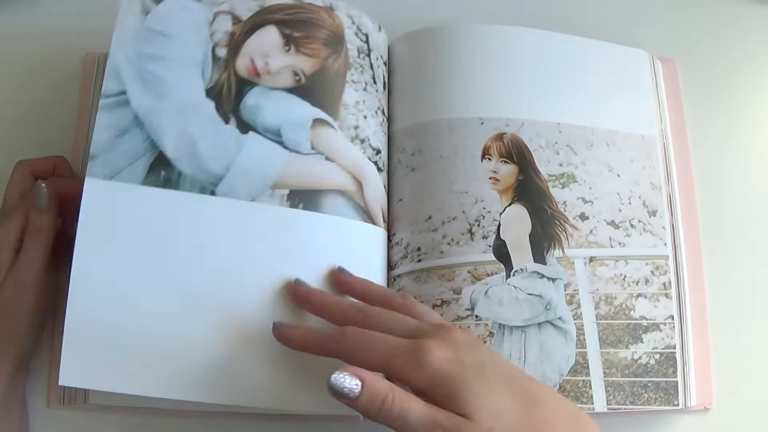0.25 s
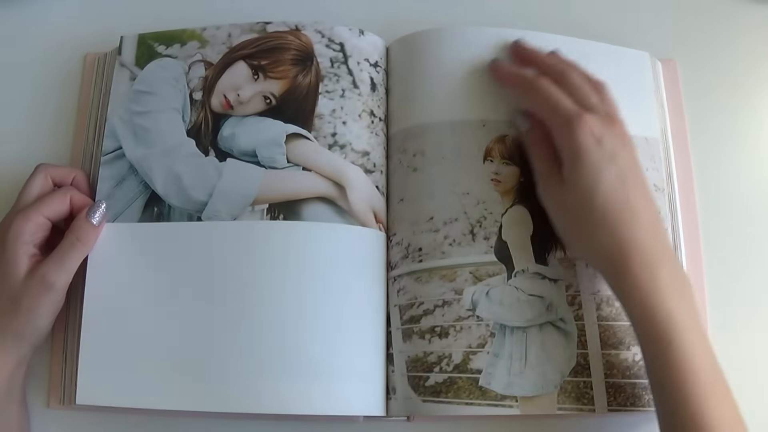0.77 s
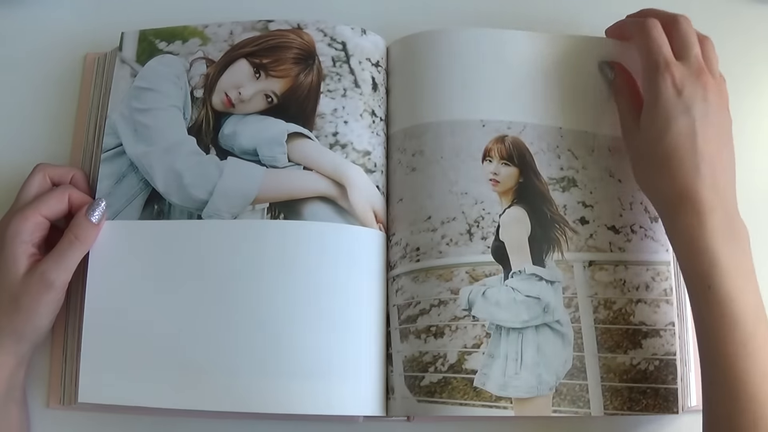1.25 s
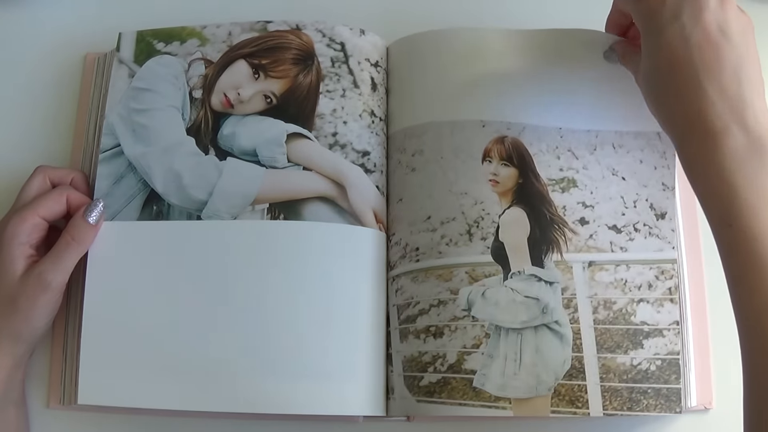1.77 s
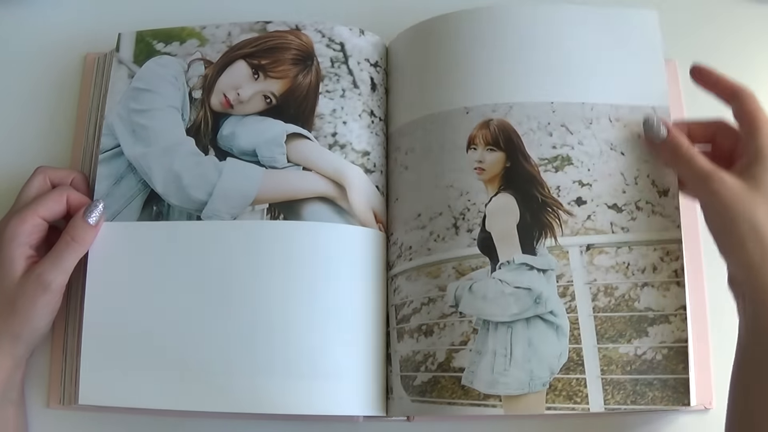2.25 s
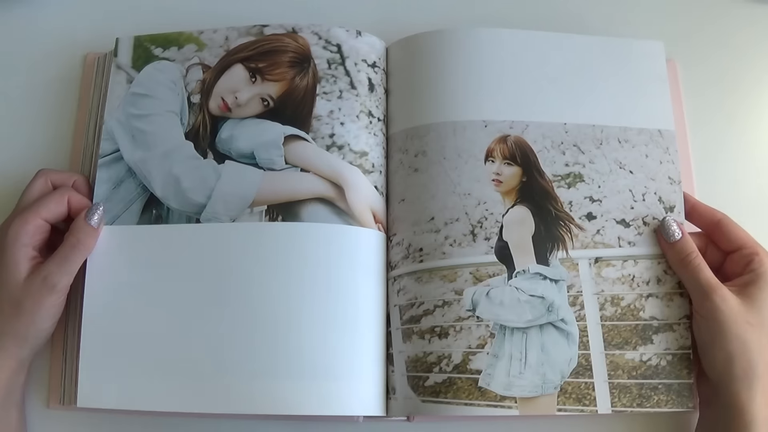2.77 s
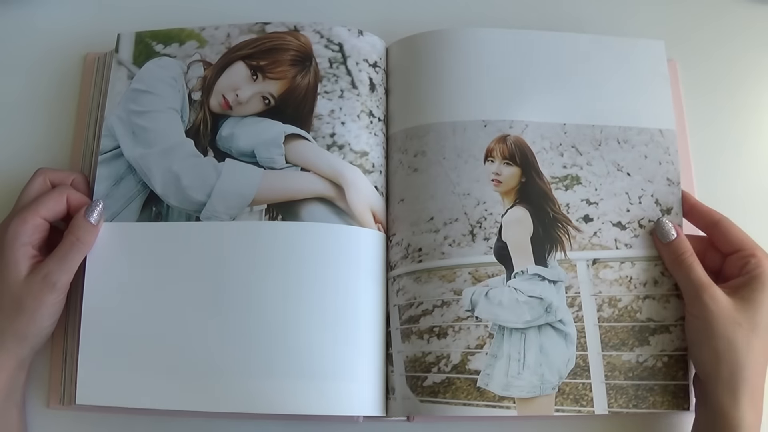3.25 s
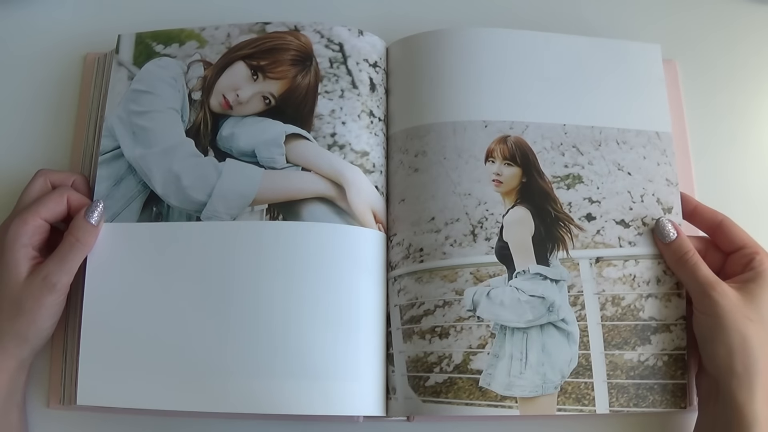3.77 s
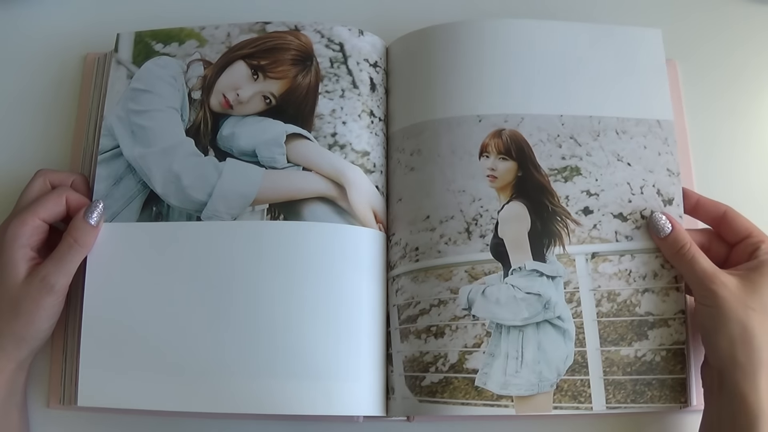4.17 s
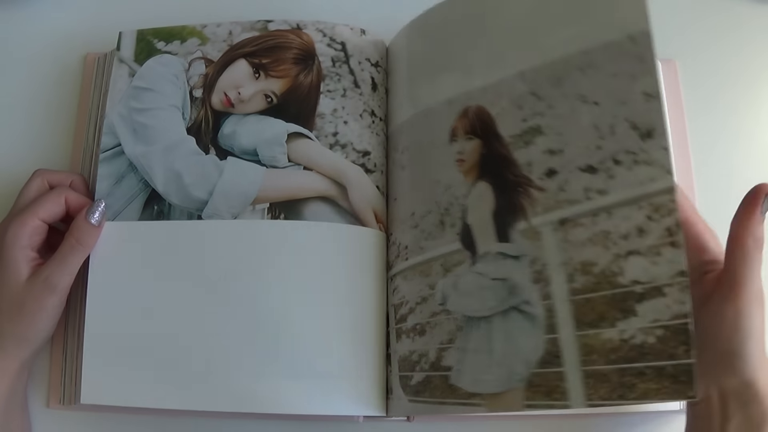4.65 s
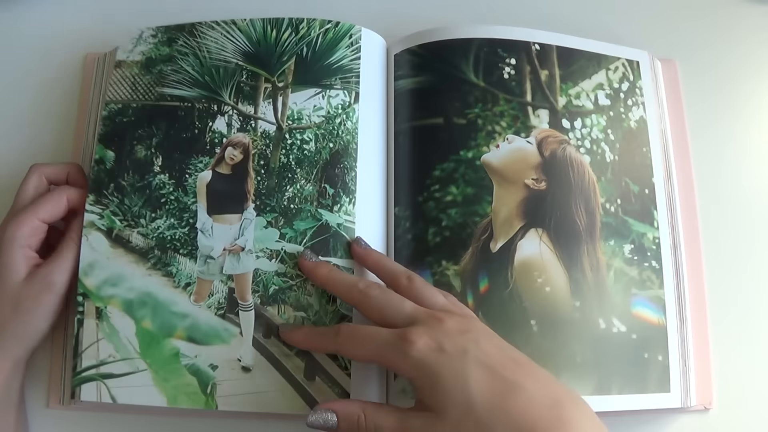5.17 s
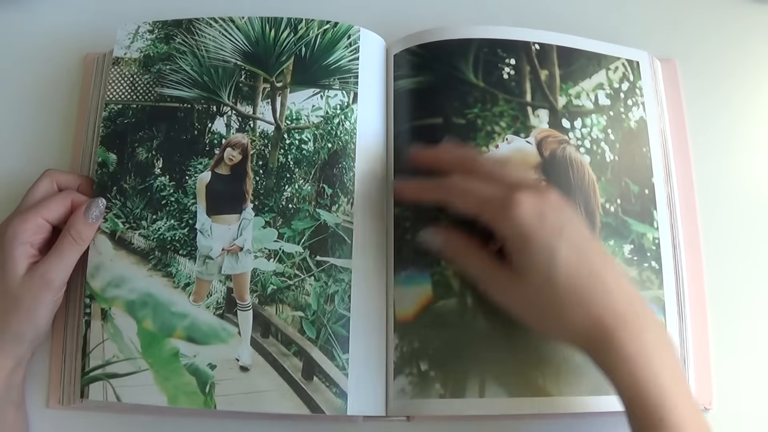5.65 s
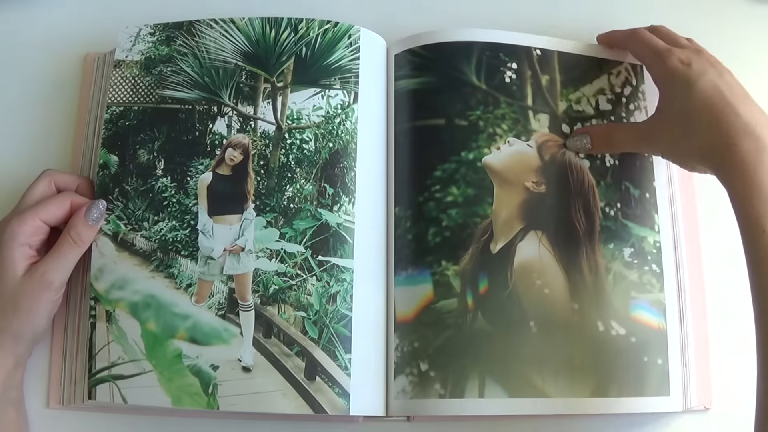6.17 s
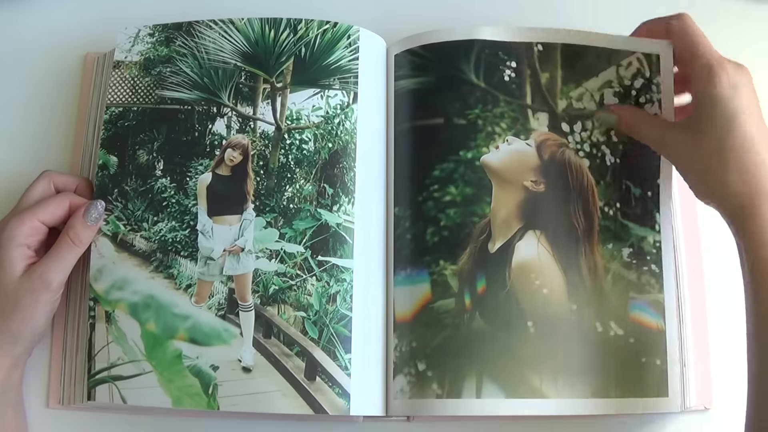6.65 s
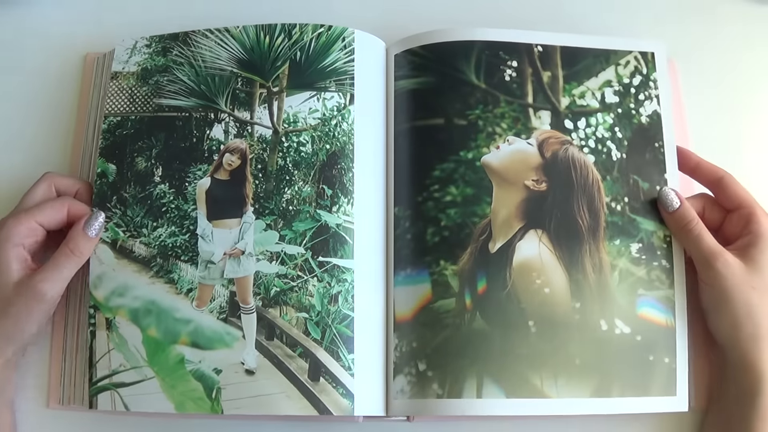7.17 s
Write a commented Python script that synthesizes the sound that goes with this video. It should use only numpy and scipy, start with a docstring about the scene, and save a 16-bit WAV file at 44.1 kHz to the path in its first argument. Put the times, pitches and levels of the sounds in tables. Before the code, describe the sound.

A large book with stiff glossy pages is handled close to the microphone in a small quiet room. For the first second or so, a palm smooths a page with a soft hiss. From 1.4 seconds a finger rubs the corner free in scratchy strokes, with a snap at 2 seconds and a sliding rustle until about 2.7. Faint creaks and nail ticks follow as the bent page is held. Between 4.2 and 4.6 seconds the sheet buckles with several sharp pops, the loudest moment. It lifts, swishes over and lands slightly to the left with a tick around 5.2. A crisp snap and another smoothing hiss come at 5.6. From 6.5 seconds fingers pick up the next page, with a pop at 6.7 and a slide along its edge, ending in light ticks. Low room hum, faint camera ticking and a thin high whistle continue throughout.

```python
"""A small quiet room, where hands leaf through a large book of stiff glossy paper on a table.
A palm smooths the page and a finger rubs the corner free: countless tiny slips make the paper hiss.
The bent sheet creaks, buckles with sharp pops, swings over and lands; the next page is smoothed
and picked up. Table and walls add short echoes. Underneath, the room hums and a camera faintly
ticks and whistles."""
import sys
import numpy as np
from scipy import signal
from scipy.fft import rfft, irfft, next_fast_len
from scipy.io import wavfile
from scipy.ndimage import uniform_filter1d, map_coordinates

SR = 44100
rng = np.random.default_rng(int(sys.argv[2]) if len(sys.argv) > 2 else 0)


def wrap_up_sound(samples):
    """Save the sound to the file named by the first command line argument, as 16-bit audio."""
    columns = np.atleast_2d(samples).T
    # keep every value between -1 and 1, then stretch to whole-number steps
    tamed = np.clip(columns, -1, 1)
    steps = np.round(tamed * 32767).astype(np.int16)
    wavfile.write(sys.argv[1], SR, steps)


N = 326937

# Each rubbing move has two tables. A tone says how strong the low and high pitches are.
# Strokes: start_s, rise_s, fall_s, sheet_db, rasp_db, hiss_db. Tone: pitch_hz, level_db
PALM_STROKES = [(-0.04, 0.034, 0.14, -64.5, -56.5, -54), (0.1, 0.2, .08, -62.5, -54.5, -58.5),
                (0.485, .285, .28, -60, -49, -44.5), (1.03, .12, .17, -62.5, -54, -60.5),
                (5.47, 0.098, .04, -52.5, -53, -53), (5.595, 0.17, 0.26, -60.5, -51, -43.5)]  # the palm smooths a page
PALM_TONE = [(150, -12), (300, -11.5), (600, -10.5), (1200, -10), (2000, -7.5), (3000, -4.5), (4200, -6),
             (6000, -4.5), (8500, -5), (10500, 1.5), (12000, 2), (13500, -6), (15400, -7)]
CORNER_STROKES = [(1.423, 0.028, 0.047, -53, -46, -52), (1.695, 0.027, 0.016, -54.5, -58, -55),
                  (1.732, 0.024, 0.055, -49, -34.5, -38.5), (1.8, 0.092, 0.049, -49, -35.5, -47),
                  (1.985, .02, 0.038, -50.5, -41.5, -55)]  # a finger rubs the corner free
CORNER_TONE = [(40, -75), (120, -47), (300, -18), (600, -13), (1050, -2.5), (1500, -4), (2200, -0.5),
               (3100, -1.5), (4000, -7), (5000, -7.5), (6500, -12), (9000, -23.5), (11300, -19.5),
               (15400, -44)]
SLIDE_STROKES = [(2.062, 0.11, 0.015, -45.5, -35, -41), (2.18, 0.016, 0.09, -52, -51, -45),
                 (2.323, 0.016, 0.063, -53.5, -54.5, -45), (2.4, 0.047, 0.067, -53, -43.5, -46),
                 (2.52, 0.032, 0.3, -56.5, -55.5, -65), (2.67, 0.019, 0.022, -56.5, -48, -52)]  # the sheet slides over its neighbour
SLIDE_TONE = [(120, -27), (300, -16.5), (600, -16), (1100, -7.5), (1600, -7.5), (2200, -6), (3300, -3.5),
              (5000, 0), (6500, -6.5), (8500, -7.5), (11700, -4.5), (13000, -14), (15400, -20)]
LIFT_STROKES = [(4.47, 0.092, 0.05, -40, -48, -57), (4.58, 0.054, 0.093, -59, -51.5, -53.5)]  # the sheet is lifted and peels away
LIFT_TONE = [(70, -28), (150, -14), (400, -16), (700, -10), (1040, -0.5), (1300, -5.5), (2000, -21),
             (3700, -22.5), (5000, -22.5), (6500, -29.5), (8500, -25), (12000, -25), (15400, -37)]
SWING_STROKES = [(4.798, 0.18, 0.12, -61.5, -52, -47.5), (4.979, .01, 0.033, -43, -44.5, -61),
                 (5.09, .09, .12, -51, -51.5, -55.5)]  # it swings over, lands and settles
SWING_TONE = [(80, -21), (150, -18), (500, -13.5), (750, -17), (1100, -4.5), (1420, -2), (2200, -9),
              (3500, -8.5), (4500, -8), (5600, -11), (8500, -16), (11300, -14.5), (15400, -24.5)]
PICK_STROKES = [(6.52, 0.066, 0.025, -44.5, -40, -46), (6.615, .1, 0.078, -47.5, -40.5, -42.5),
                (6.77, .09, 0.18, -58, -46, -44.5), (6.96, 0.074, 0.076, -57.5, -47.5, -62),
                (7.105, 0.014, 0.034, -54.5, -54.5, -52)]  # fingers pick up the next page and run down its edge
PICK_TONE = [(120, -22), (300, -17.5), (700, -10.5), (1300, -8.5), (2200, -1), (3100, 1.5), (4000, -0.5),
             (4600, 0), (5200, 1), (6200, -5), (8500, -11), (11000, -6), (12500, -11.5), (15400, -23)]

# The sheet buckles: start_s, level_db, pitch_hz, decay_s, crack_db, thump_db
POPS = [(1.985, -14, 2830, 0.0081, -24.5, -39), (4.1843, -18, 1330, 0.0071, -12, -8.5),
        (4.263, -10, 1250, 0.0064, -14.5, -19), (4.3657, -14, 1130, 0.012, -14.5, -16),
        (4.3974, -16, 1270, 0.01, -16, -18), (4.4086, -21, 1410, 0.0099, -11, -25),
        (4.5511, -22.5, 1020, 0.035, -24, -24), (5.586, -30.5, 1370, 0.011, -6.5, -12),
        (6.719, -11, 758, 0.02, -17, -10.5)]  # every decay_s is the time a sound takes to fade by 60 dB
# The open pages and the table ring: pitch_hz, level_db, decay_s
BOOK_RINGS = [(282, -12.5, 0.053), (627, -23, 0.11), (705, -21, 0.12), (770, -25, .11), (1040, -20, 0.11),
              (1280, -16.5, 0.068), (1444, -22, 0.1)]
# Nails and page edges tick, and the landing sheet clicks at 5.2 s: start_s, level_db, pitch_hz
TICKS = [(0.1848, -40.5, 2000), (0.408, -37, 1440), (1.704, -37, 1420), (2.326, -31, 1030),
         (3.239, -41, 1210), (3.679, -39, 2010), (3.908, -38.5, 2010), (4, -39.5, 1290), (4.045, -35, 1310),
         (4.8037, -33, 1000), (4.873, -38, 1540), (5.173, -40, 1170), (5.186, -45, 4640), (5.2, -22, 1500),
         (5.482, -35, 1870), (5.5629, -37, 1250), (6.295, -34, 820), (7.117, -34.5, 1430),
         (7.229, -40.5, 1180)]
# An edge flicks past its neighbours: middle_s, level_db, half_length_s, pitch_hz
FLICKS = [(0.566, -44, 0.0043, 5760), (1.16, -53, 0.011, 4500), (1.756, -37.5, 0.014, 4330),
          (1.983, -29, 0.00096, 2080), (2.074, -38.5, .004, 4300), (2.172, -34.5, 0.0069, 4630),
          (4.99, -33.5, 0.0043, 1530), (6.295, -50.5, 0.0028, 8500), (6.586, -37, 0.0045, 4530),
          (6.711, -26.5, 0.0025, 2180), (6.72, -21, 0.0009, 2930), (7.231, -49, 0.0068, 8200)]
# The sheet flaps and pushes air: start_s, level_db, rise_s, decay_s
FLAPS = [(0.72, -58, .02, 0.19), (2.027, -34, 0.0033, 0.14), (2.239, -48.5, 0.016, 0.4),
         (4.265, -33, 0.0021, 0.14), (4.396, -37.5, 0.0054, 0.18), (4.81, -46.5, 0.019, 0.36),
         (5.17, -51.5, 0.011, 0.49), (5.55, -50.5, 0.018, 0.14), (6.555, -47.5, 0.01, .2),
         (6.722, -49, 0.0033, 0.082)]
# Fingers creak on the bent page: start_s, rise_s, fall_s, level_db
CREAKS = [(2.8, .3, 0.17, -66), (3.47, .03, 0.085, -60.5), (3.67, .2, 0.21, -57), (5.32, 0.097, .08, -63)]
# Air under the sheet hoots as its pocket changes size:
# start_s, rise_s, fall_s, first_hz, last_hz, level_db
POCKET_HOOTS = [(0.3, 0.089, 0.24, 1453, 1456, -57), (2.155, .01, .105, 1658, 1403, -45.5),
                (2.41, 0.042, 0.18, 1070, 1527, -47), (4.49, 0.093, .05, 1190, 963, -44),
                (6.73, .01, 0.091, 723, 800, -54), (6.98, 0.086, 0.042, 1230, 1935, -50)]
# Skin on glossy paper gives a thin, high hiss: start_s, rise_s, fall_s, first_hz, last_hz, level_db
SKIN_HISSES = [(0.72, .28, .28, 3023, 3094, -57), (2.43, .02, 0.12, 4860, 4920, -55),
               (6.85, 0.132, 0.071, 4990, 5130, -48)]

# The tones of the other sounds: pitch_hz, level_db
CRACK_TONE = [(300, -4), (1300, 0.5), (2200, 1), (4800, 1.5), (6500, -9), (11500, -8), (15500, -27)]  # bright snap of paper
FLAP_TONE = [(60, -24), (150, -6), (260, -2.5), (450, 0.5), (750, -2), (1050, -6), (1500, -25),
             (3000, -41.5), (9000, -63)]  # low puff of air
CREAK_TONE = [(60, -22), (150, -1.5), (380, -1.5), (650, -3.5), (1100, 0.5), (2100, -0.5), (3000, -7),
              (4300, -8.5), (6000, -17.5), (11000, -20), (15000, -32)]  # dry ticks under the thumb
ECHO_TONE = [(100, 8), (300, 3.5), (1200, -2.5), (3000, -4.5), (6000, -9), (13000, 4.5)]  # sound bouncing off table and walls
AIR_TONE = [(12, -49), (20, -11), (98, -3), (122, -3.5), (196, -1.5), (297, -8), (361, -7.5), (532, -6),
            (647, -9.5), (703, -8.5), (2200, -12), (2390, -9.5), (2990, -12.5), (10700, -17.5),
            (15400, -21.5)]  # room air and microphone hiss
# How long the room echoes: pitch_hz, decay_s
ECHO_DECAY = [(150, 0.2), (700, 0.21), (2000, 0.32), (5000, 0.34), (12000, 0.096)]
# Low room hum and high camera whistle: pitch_hz, level_db
STEADY_TONES = [(97, -69), (15625, -63.5)]
# How wide the sound spreads: pitch_hz, side_gain_db
STEREO_WIDTH = [(30, -13), (120, -21), (300, -9), (1200, -5.5), (3000, -7), (6000, -13), (10000, -16.5),
                (14000, -53)]
# How much louder the left microphone is than the right: pitch_hz, gain_db
LEFT_GAIN = [(30, -0.5), (150, 1.5), (350, 2), (1200, 1), (2800, 0.5), (12000, -0.5)]
# How far the wave at the left microphone runs ahead: pitch_hz, phase_rad
LEFT_LEAD = [(40, 0.069), (260, 0.37), (1100, 0.8), (2500, 0.57), (4500, 0.46), (8000, 0.36), (12000, 0)]

RELEASE_S = 0.077  # a stroke dies away this fast as it lets go
SHEET_GROWTH, HISS_GROWTH = 0.89, 1.38  # hiss swells more, so a harder stroke is brighter
THUMP_HZ, THUMP_DECAY_S = 255, 0.022  # the air shoved aside by a buckle
TOP_HZ = 15870


def rub(strokes, tone, slips_per_s, slip_db, attack_s, swell_db, fade_db):
    """Rubbing: countless tiny slips stir the sheet's body, its rasping surface and a fine hiss."""
    def below(hz, edge_hz):
        return 1 / (1 + (hz / edge_hz) ** 8)

    def three_bands(hz):
        return np.array([below(hz, 1800), below(hz, 7000) - below(hz, 1800), 1 - below(hz, 7000)])

    friction = rng.standard_normal(N) + amp(slip_db) * slips(slips_per_s, spread_db=3)
    friction = shifting_rings(friction, depth_db=1.5)
    bands = filtered(friction, lambda hz: amp(along(tone, hz)) * three_bands(hz))
    out = np.zeros(N)
    for band, growth in enumerate([SHEET_GROWTH, 1, HISS_GROWTH]):
        loudness = sum(
            amp(levels_db[band]) * stroke(s, rise, fall, attack_s, growth * swell_db, growth * fade_db)
            for s, rise, fall, *levels_db in strokes)
        out += unit(bands[band]) * loudness
    return out * amp(0.92 * wobble(70))  # the pressure is never quite steady


def slips(per_s, spread_db):
    """The surfaces catch and let go: tiny clicks of uneven size at random times."""
    clicks = (rng.random(N) < per_s / SR) * rng.choice([-1, 1], N)
    sizes = amp(spread_db * np.clip(rng.standard_normal(N), -2, 2))
    return unit(clicks * sizes)


def shifting_rings(x, depth_db):
    """The paper's weak ringing pitches come and go as the touching point travels."""
    spectrum = signal.stft(x, nperseg=512)[2]
    patches = uniform_filter1d(rng.standard_normal(spectrum.shape), size=7, axis=0)  # smooth over pitch
    patches = uniform_filter1d(patches, size=24, axis=1)  # and over time
    return signal.istft(spectrum * amp(depth_db * unit(patches)), nperseg=512)[1][:N]


def pops():
    """The bent sheet strains, then snaps with a crack, a short ring and a thump; the book rings on."""
    out, t = np.zeros(N), np.arange(SR // 5) / SR
    onset = 1 - np.exp(-t / 0.00025)
    for s, db, pitch_hz, decay_s, crack_db, thump_db in POPS:
        strain = noise(CRACK_TONE, len(t)) * decay(t[::-1], 0.016)  # swells up to the snap
        add(out, s - t[-1], amp(db - 28) * strain)
        ring = np.sin(2 * np.pi * pitch_hz * t) * decay(t, decay_s)
        crack = noise(CRACK_TONE, len(t)) * (decay(t, 0.0018) + 0.21 * decay(t, 0.065))
        thump = np.sin(2 * np.pi * THUMP_HZ * t) * decay(t, THUMP_DECAY_S)
        snap = ring + amp(crack_db + 7.5) * crack + amp(thump_db - 7.5) * thump
        add(out, s, amp(db) * (snap + book_ring(t, pitch_hz)) * onset)
    return filtered(out, lambda hz: (1j * hz / (130 + 1j * hz)) ** 2)  # a light sheet has little bass


def book_ring(t, snap_hz):
    """Pages and table ring in answer to a snap, most strongly near its pitch."""
    out = np.zeros(len(t))
    for hz, db, decay_s in BOOK_RINGS:
        strength = amp(db - 3 + rng.normal(0, 4.1)) * abs(resonance(hz, snap_hz, q=1.34))
        out += strength * decay(t, decay_s) * np.sin(2 * np.pi * (hz * t + rng.random()))
    return out


def ticks():
    """Nails and edges touch lightly, and the landing sheet clicks: a soft click with a tiny ring and scuff; low
    ones are duller."""
    out, t = np.zeros(N), np.arange(SR // 15) / SR
    onset = 1 - np.exp(-t / 0.0003)
    for s, db, pitch_hz in TICKS:
        ring = np.sin(2 * np.pi * pitch_hz * t) * decay(t, 0.0097)
        click = noise(CRACK_TONE, len(t)) * (decay(t, 0.011) + 0.22 * decay(t, 0.077))
        click = filtered(click, lambda hz: 1 / (1 + 1j * hz / (4 * pitch_hz)))
        add(out, s, amp(db) * (0.85 * ring + 0.56 * click) * onset)
    return filtered(out, lambda hz: 1j * hz / (300 + 1j * hz))  # thin out the bass


def flicks():
    """An edge slips off its neighbours with a short scrape that swells and fades."""
    out, t = np.zeros(N), np.arange(-SR // 10, SR // 10) / SR
    for s, db, half_length_s, pitch_hz in FLICKS:
        scrape = filtered(noise(CRACK_TONE, len(t)), lambda hz: 0.2 + resonance(hz, pitch_hz, q=6.6))
        swell = np.exp(-0.5 * (t / half_length_s) ** 2)
        add(out, s + t[0], amp(db - 1.5) * unit(scrape) * swell)
    return out


def flaps():
    """The whole sheet bends and pushes air with a soft, low flutter."""
    out, t = np.zeros(N), np.arange(SR // 2) / SR
    for s, db, rise_s, decay_s in FLAPS:
        swell = (1 - np.exp(-(t / rise_s) ** 2)) * decay(t, decay_s)
        add(out, s, amp(db - 4.5) * swell / swell.max() * noise(FLAP_TONE, len(t)))
    return out


def creak(slips_per_s, unevenness, decay_s):
    """The thumb sticks and slips on the bent page in a fairly even run of dry ticks."""
    out, t = np.zeros(N), np.arange(SR // 40) / SR
    gaps, sizes = rng.standard_normal((400, 2)).T
    grip = sum(amp(db) * stroke(s, rise, fall, attack_s=0.008, swell_db=3, fade_db=6.5)
               for s, rise, fall, db in CREAKS)
    start_s, end_s = CREAKS[0][0], sum(CREAKS[-1][:3])
    times = start_s + np.cumsum(np.exp(unevenness * gaps)) / slips_per_s
    for s, size in zip(times, sizes):
        if s < end_s:
            add(out, s, amp(2 * size) * decay(t, decay_s) * rng.standard_normal(len(t)))
    hiss = 0.057 * rng.standard_normal(N)
    return grip * unit(with_tone(out + hiss, CREAK_TONE))


def gliding_scuff(strokes, width_hz, scuff_db, attack_s, swell_db, fade_db):
    """Uneven scuffs stir a breathy note whose pitch slides evenly through each stroke."""
    slow_noise = unit(filtered(rng.standard_normal((2, N)), lambda hz: 1 / (1 + 1j * hz / width_hz) ** 2))
    out = np.zeros(N)
    for s, rise, fall, first_hz, last_hz, db in strokes:
        gain = amp(db) * stroke(s, rise, fall, attack_s, swell_db, fade_db)
        on = np.flatnonzero(gain)
        pitch_hz = np.interp(on / SR, [s, s + rise + fall], [first_hz, last_hz])
        phase = 2 * np.pi * np.cumsum(pitch_hz) / SR
        out[on] += gain[on] * (slow_noise[0, on] * np.sin(phase) + slow_noise[1, on] * np.cos(phase))
    return out * unit(amp(scuff_db * wobble(45)))


def room_echoes(x):
    """Echoes off table and walls, as mid and side; they change as the hands move."""
    out = np.zeros((2, N))
    block = SR // 3  # a fresh random echo every third of a second
    for start in range(0, N, block):
        hz, t, spectrum = signal.stft(rng.standard_normal((2, block)), SR, nperseg=256)
        tails = signal.istft(spectrum * decay(t, along(ECHO_DECAY, hz)[:, None]), SR, nperseg=256)[1]
        tails = with_tone(tails / np.linalg.norm(tails[0]), ECHO_TONE)
        for track, tail in zip(out, tails):
            add(track, start / SR + 0.002, signal.fftconvolve(x[start:start + block], tail))
    return out


def lens_motor(chirps_per_s, pitch_hz, half_length_s, level_db):
    """The camera's lens motor ticks: a steady run of tiny falling chirps."""
    out, t = np.zeros(N), np.arange(-SR // 50, SR // 50) / SR
    times = np.arange(1, N / SR * chirps_per_s) / chirps_per_s + 0.002
    swell = np.exp(-0.5 * (t / half_length_s) ** 2)
    for s, (size, detune) in zip(times, rng.standard_normal((len(times), 2))):
        phase = 2 * np.pi * pitch_hz * (1 + 0.02 * detune) * (t - 5 * t ** 2)
        add(out, s + t[0], amp(1.2 * size) * np.sin(phase) * swell)
    return out * amp(level_db)


def background():
    """Room air, microphone hiss, a low hum and the camera's whistle, as mid and side."""
    t = np.arange(N) / SR
    tones = sum(amp(db) * np.sin(2 * np.pi * hz * t) for hz, db in STEADY_TONES)
    mid_air = amp(-58.5) * noise(AIR_TONE, N)
    side_air = amp(-56.5) * noise(AIR_TONE, N)
    return np.array([mid_air + tones, side_air])


def stroke(start_s, rise_s, fall_s, attack_s, swell_db, fade_db):
    """The loudness of one stroke: it takes hold, swells, fades and lets go."""
    length_s = rise_s + fall_s + RELEASE_S
    on = np.arange(max(int(start_s * SR), 0), min(int((start_s + length_s) * SR), N))
    t = on / SR - start_s
    effort_db = np.interp(t, [0, rise_s, rise_s + fall_s, length_s],
                          [-swell_db, 0, -fade_db, -fade_db - 67])
    gain = np.zeros(N)
    gain[on] = amp(effort_db) * np.clip(t / attack_s, 0, 1)
    return gain


def amp(db):
    """Turn decibels into a number to multiply by."""
    return 10 ** (np.asarray(db) / 20)


def decay(t, decay_s):
    """A fade that drops 60 dB in decay_s."""
    return amp(-60 * t / decay_s)


def unit(x):
    """Scale a sound to an average strength (rms) of 1."""
    return x / np.sqrt(np.mean(x ** 2) + 1e-20)


def along(table, hz):
    """Look up a pitch in a table, blending between its rows."""
    pitches, values = np.transpose(table)
    return np.interp(np.log(hz + 1), np.log(pitches + 1), values)


def wobble(per_s):
    """A smooth curve through per_s random points a second."""
    return map_coordinates(rng.standard_normal(int(N * per_s / SR) + 4), [np.arange(N) * per_s / SR])


def filtered(x, response):
    """Multiply each pitch in a sound by response(hz)."""
    length = x.shape[-1]
    padded = next_fast_len(length + 4096)
    return irfft(rfft(x, padded) * response(np.fft.rfftfreq(padded, 1 / SR)), padded)[..., :length]


def resonance(hz, centre_hz, q):
    """A filter that favours pitches near centre_hz; a higher q is narrower."""
    damping = 1j * hz * centre_hz / q
    return damping / (centre_hz ** 2 - hz ** 2 + damping)


def with_tone(x, tone):
    """Turn pitches up or down as a tone table says."""
    return filtered(x, lambda hz: amp(along(tone, hz)))


def noise(tone, size):
    """Noise of strength 1 with the given tone."""
    return unit(with_tone(rng.standard_normal(size), tone))


def add(track, start_s, sound):
    """Mix a sound into a track at start_s."""
    start = max(round(start_s * SR), 0)
    track[start:start + len(sound)] += sound[:N - start]


def microphone_pair(hz):
    """Two close microphones hear each pitch with slightly different strength and timing."""
    shares = [0.5, -0.5]  # left, right
    gain = amp(np.outer(shares, along(LEFT_GAIN, hz)))
    return gain * np.exp(1j * np.outer(shares, along(LEFT_LEAD, hz)))


def scene():
    """Paper, room and camera together, in left and right channels."""
    swing = rub(SWING_STROKES, SWING_TONE, slips_per_s=770, slip_db=-3.5,
                attack_s=0.0054, swell_db=4.5, fade_db=10.5)
    palm = rub(PALM_STROKES, PALM_TONE, slips_per_s=3600, slip_db=-5.5,
               attack_s=0.054, swell_db=10, fade_db=10.5)
    corner = rub(CORNER_STROKES, CORNER_TONE, slips_per_s=2000, slip_db=-4,
                 attack_s=0.01, swell_db=7, fade_db=7)
    slide = rub(SLIDE_STROKES, SLIDE_TONE, slips_per_s=3300, slip_db=-1,
                attack_s=0.008, swell_db=9, fade_db=8.5)
    pick = rub(PICK_STROKES, PICK_TONE, slips_per_s=3300, slip_db=-3,
               attack_s=0.032, swell_db=6.5, fade_db=7)
    lift = rub(LIFT_STROKES, LIFT_TONE, slips_per_s=700, slip_db=-1.5,
               attack_s=0.028, swell_db=3.5, fade_db=5)
    hoots = gliding_scuff(POCKET_HOOTS, width_hz=194, scuff_db=3, attack_s=0.012, swell_db=7, fade_db=12)
    skin = gliding_scuff(SKIN_HISSES, width_hz=312, scuff_db=1.5, attack_s=0.02, swell_db=4, fade_db=6)
    touches = pops() + ticks() + flicks() + flaps()
    creaking = creak(slips_per_s=68, unevenness=0.25, decay_s=0.012)
    paper = palm + corner + slide + lift + swing + pick + hoots + skin + touches + creaking
    # mid is what both ears share; side is added on the left and taken away on the right
    mid, side = amp(-6) * room_echoes(paper) + background()
    mid = mid + paper + lens_motor(chirps_per_s=25, pitch_hz=2590, half_length_s=0.003, level_db=-56)
    side = side + 0.23 * swing  # the turned sheet lands on the left
    side = amp(1) * with_tone(side, STEREO_WIDTH)
    return filtered(np.array([mid + side, mid - side]), microphone_pair)


def record(dry):
    """Cut away every pitch above TOP_HZ."""
    return filtered(dry, lambda hz: hz < TOP_HZ)


dry = scene()
out = record(dry)
wrap_up_sound(out)
```